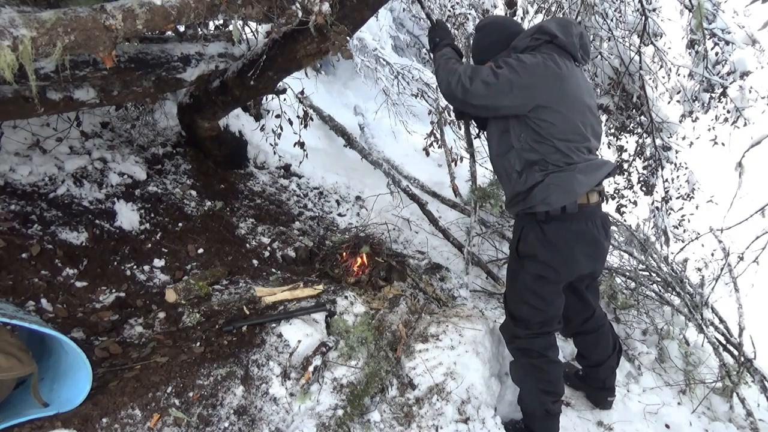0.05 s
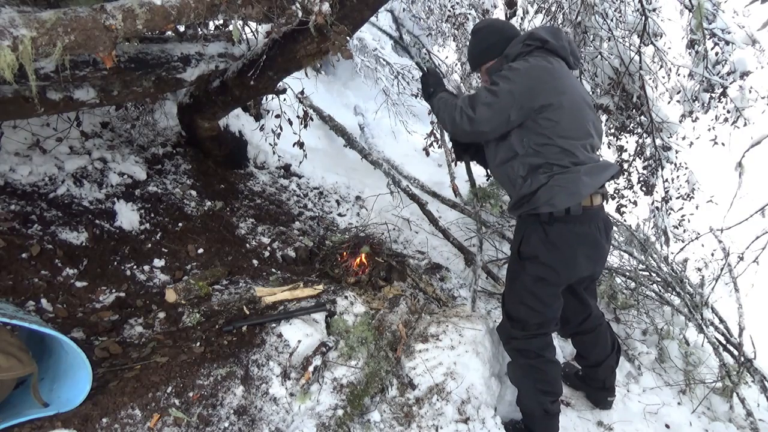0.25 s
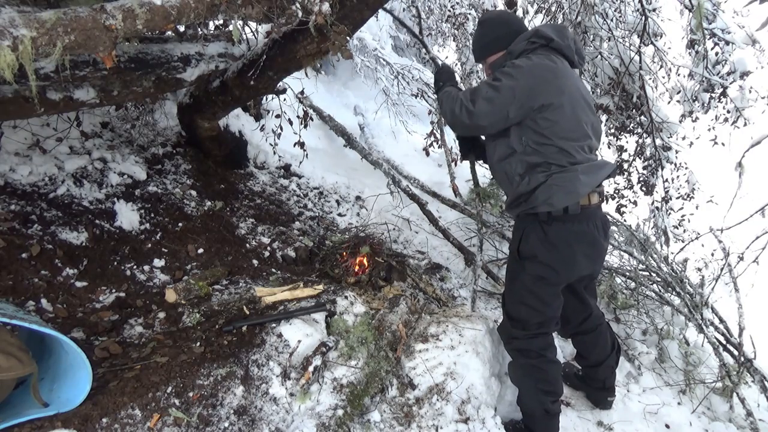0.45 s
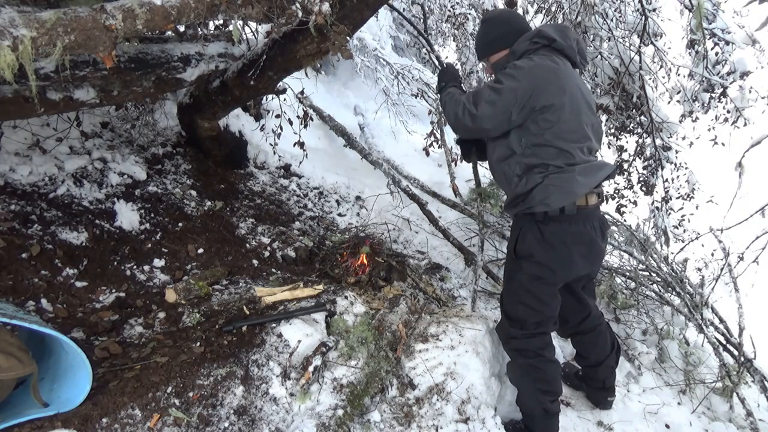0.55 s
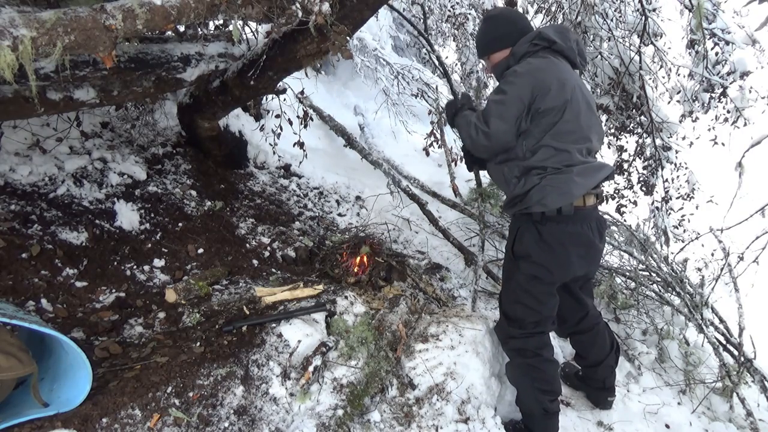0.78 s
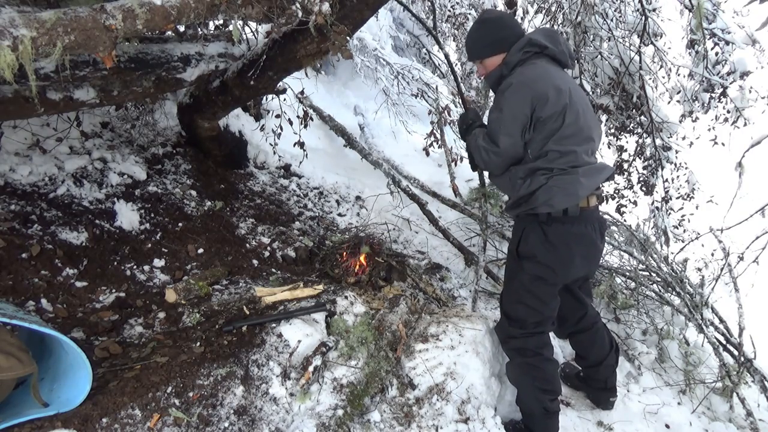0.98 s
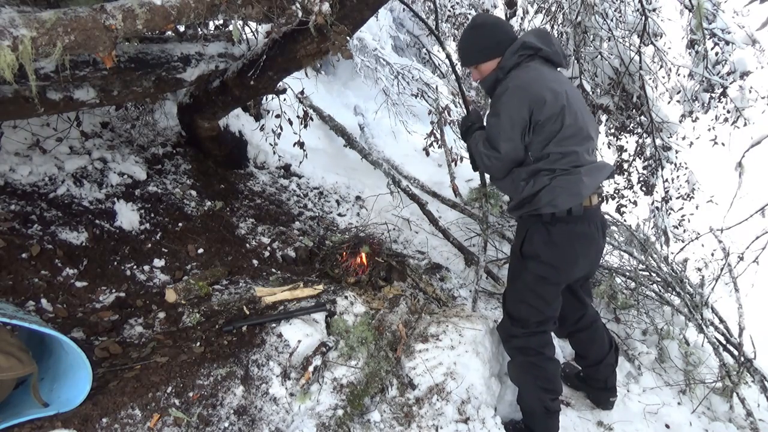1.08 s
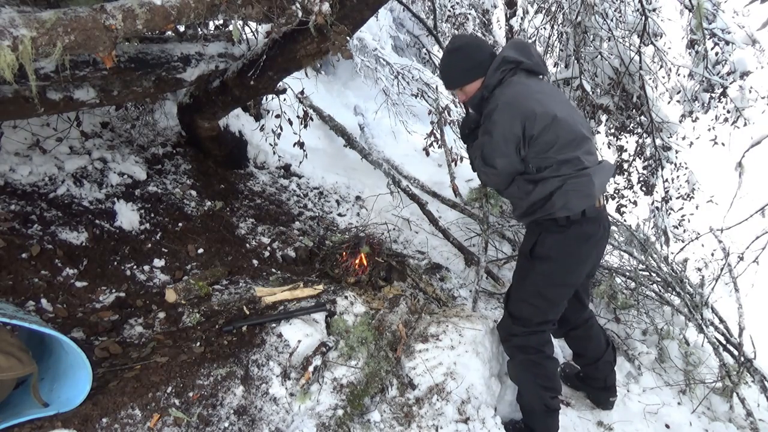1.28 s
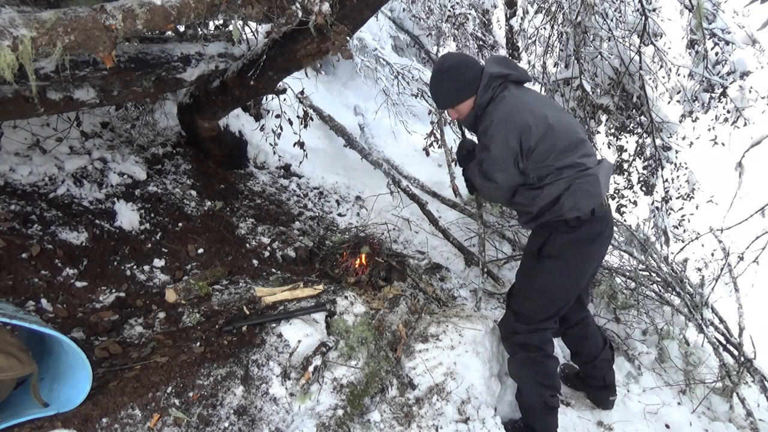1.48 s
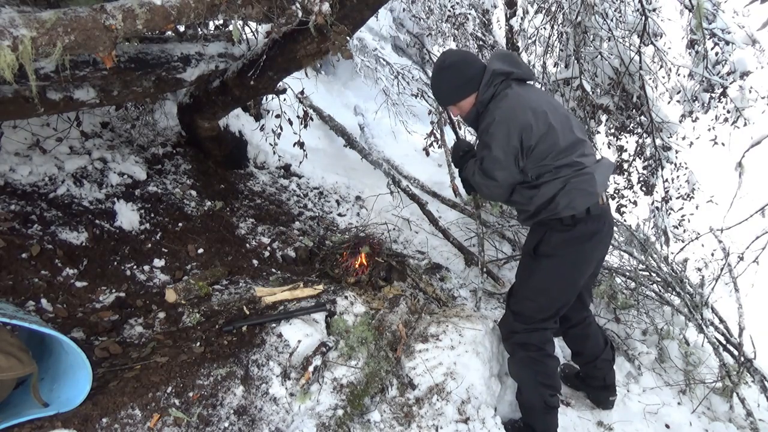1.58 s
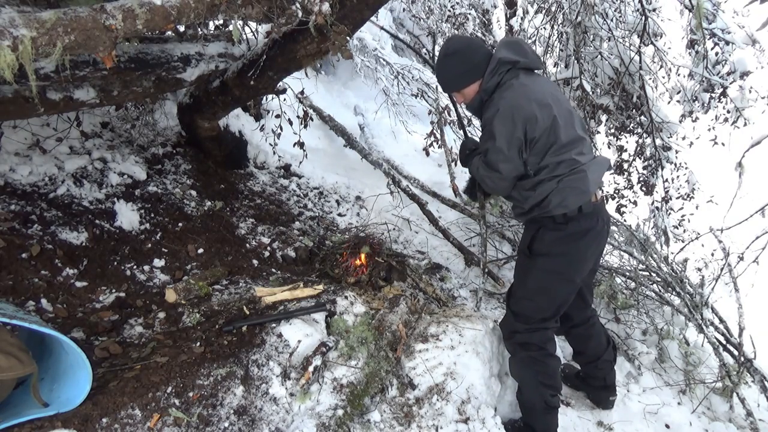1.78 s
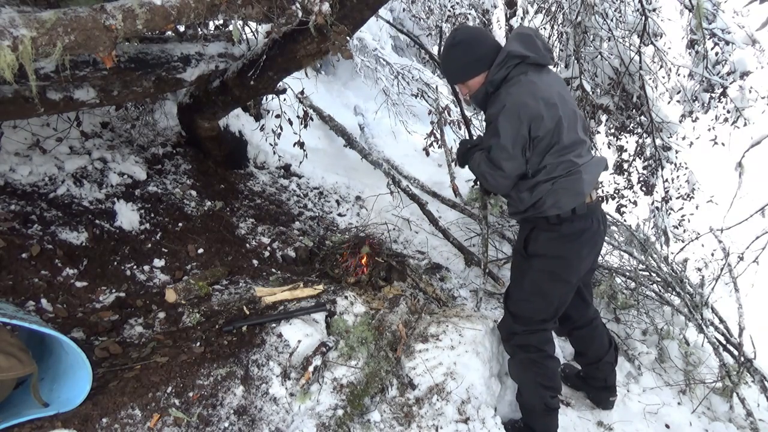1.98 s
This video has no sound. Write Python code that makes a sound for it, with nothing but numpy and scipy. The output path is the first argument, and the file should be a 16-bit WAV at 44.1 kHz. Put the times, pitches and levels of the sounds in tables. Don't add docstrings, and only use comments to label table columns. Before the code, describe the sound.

Dry twigs rustle and scrape, one stick snaps sharply, beside a small softly crackling campfire

```python
import sys
import numpy as np
from scipy import signal
from scipy.fft import rfft, irfft
from scipy.io import wavfile
from scipy.ndimage import uniform_filter1d

SR = 44100
rng = np.random.default_rng(int(sys.argv[2]) if len(sys.argv) > 2 else 0)


def transcribe(signal):
    frames = np.atleast_2d(signal).T
    limited = np.clip(frames, -1, 1)
    pcm = np.round(limited * 32767).astype(np.int16)
    wavfile.write(sys.argv[1], SR, pcm)


def ratio(d):
    e = np.asarray(d, float) / 20
    return 10 ** e


N = 90404

# columns f/Hz, level/dB per Hz
FIRE_SPECTRUM = [(30, -11.5), (70, -4.5), (400, -5), (1000, -9), (3000, -15), (5700, -9.5), (10500, -7),
                 (15500, -18)]
FIRE_DB, PATCHY_DB, SWELL_DB = -47, 2.0, 0.3

# columns t/s, length/s, from f/Hz, to f/Hz, level/dB
SAP_WHISTLES = [
    (.018, .01, 9800, 9000, -53),
    (.03, .012, 10800, 10000, -56),
    (.048, .018, 10500, 9300, -53),
    (.066, .016, 8600, 9600, -52),
    (.088, .012, 9300, 10200, -54),
    (.356, .018, 8800, 8300, -54),
    (.428, .011, 10400, 8500, -48),
    (.985, .03, 10700, 11000, -56),
]
SAP_WIDTH_HZ = 120

# columns t/s, peak level/dB, low edge f/Hz, high edge f/Hz, ring f/Hz
TICKS = [(0.1734, -23.5, 4050, 13500, 6640), (.2045, -37, 3480, 7000, 5200),
         (0.378, -22, 4840, 15700, 15600), (0.406, -26.5, 4000, 15000, 13200),
         (0.4077, -29, 4000, 15000, 9900), (.4745, -38.5, 398, 4500, 1780),
         (.516, -34, 11000, 16000, 14000), (.553, -49, 10000, 16000, 13000),
         (1.0976, -13.5, 2430, 14800, 7000), (1.0979, -27.5, 435, 2730, 6800),
         (1.0981, -20, 8500, 13000, 10400), (1.1067, -26.5, 2050, 11000, 4330),
         (1.5838, -26, 5370, 15500, 9600), (1.595, -27, 8600, 16000, 11500),
         (1.6268, -18, 4630, 11900, 5370), (1.6262, -35, 795, 2980, 5370), (1.7862, -33.5, 610, 2500, 1700),
         (1.796, -22, 8000, 15400, 10000), (1.8633, -34.5, 1190, 2570, 1960),
         (1.872, -14.5, 4740, 14900, 8750), (1.875, -21, 5000, 14000, 8000),
         (1.8713, -33, 1390, 2560, 2010), (0.2789, -15, 4500, 11600, 8200),
         (0.6476, -27.5, 1000, 13000, 2230), (1.287, -25, 7000, 11000, 9050),
         (1.3671, -31, 4000, 11000, 6640), (1.473, -35, 7000, 11000, 8800), (.568, -38, 8000, 15000, 12000),
         (0.426, -40, 1500, 6000, 4000), (0.3303, -34, 6000, 15000, 12000)]
NEAR_TICKS = [
    .3773,
    1.0979,
    1.6268,
]
TICK_RING_DB, TICK_RING_CYCLES, TICK_EDGE_S = -6, 22, 0.0007
TICK_TAIL_DB, TICK_TAIL_S = -13, 0.025
SPARKS_PER_S, SPARK_DB = 25, -37

# columns t/s, rise/s, fall/s, level/dB, grind over level/dB
STROKES = [(.19, 0.027, 0.056, -44.5, -6), (0.2328, .002, 0.0042, -30.5, -18),
           (.235, 0.0047, 0.036, -29.5, 2.5), (.25, 0.015, 0.013, -35.5, -3),
           (0.2767, 0.0007, 0.02, -38, 7), (0.284, 0.025, 0.03, -40, -7), (.33, 0.1, 0.03, -59, 4.5),
           (.46, 0.078, 0.026, -50.5, -5), (0.551, 0.058, 0.07, -44.5, -2.5),
           (0.599, 0.059, 0.039, -39, -1), (.67, 0.056, 0.38, -48, -4), (.79, 0.074, 0.11, -43.5, -4),
           (.95, 0.019, 0.13, -50.5, -14), (1.216, 0.11, 0.15, -43, -1.5), (1.364, 0.012, 0.061, -36.5, -1),
           (1.383, 0.048, 0.032, -35.5, -1.5), (1.463, 0.036, 0.083, -42, -4),
           (1.628, 0.015, 0.11, -46, 0.5), (1.704, 0.0079, 0.071, -44, -1.5),
           (1.738, 0.069, 0.046, -42, -1.5), (1.849, 0.019, 0.028, -39.5, -4),
           (1.883, 0.024, 0.22, -44, -1), (1.98, 0.056, 0.046, -43.5, -2.5)]
# columns t/s, rise/s, fall/s, level/dB
RUBS = [(0.235, 0.0061, 0.07, -40), (0.265, 0.017, 0.061, -39.5), (.6, 0.043, 0.088, -50),
        (.71, 0.028, 0.099, -48), (0.869, 0.028, 0.054, -46), (.96, 0.042, 0.018, -53.5),
        (1.239, 0.13, 0.056, -47.5), (1.359, 0.079, 0.025, -37), (1.463, 0.016, 0.1, -47.5),
        (1.564, 0.022, 0.058, -48), (1.7, 0.021, 0.058, -48.5), (1.759, 0.02, 0.19, -50.5),
        (1.889, 0.037, 0.082, -49.5), (1.99, 0.037, .04, -48)]
RISE_BEND, FALL_BEND = 0.68, 1
# columns f/Hz, level/dB per Hz
RASP = [(2500, -2), (4500, 0), (6000, 4), (9500, 1), (11500, -7), (15500, -21)]
# columns f/Hz, level/dB per Hz
GRIND = [(700, -17), (1400, 3), (3800, -5), (6000, -4.5)]
# columns f/Hz, level/dB per Hz
BODY = [(150, -13), (280, -0.5), (800, 0.5), (1400, -10.5), (2500, -7), (4500, -73)]
SLIPS_PER_S, SLIP_SPREAD_DB, FLICKER_DB = 14000, 1.6, 1.0

# columns t/s,
# rise/s, fall/s, level/dB, f/Hz
SWISHES = [(.236, 0.0066, 0.014, -31, 3930), (.236, .004, 0.014, -34, 10500),
           (0.274, 0.0016, 0.015, -27, 5100), (0.287, .002, 0.013, -36, 4320),
           (.57, 0.024, 0.032, -45.5, 5200), (.62, 0.026, 0.026, -43, 8200), (.61, 0.048, 0.055, -46, 3770),
           (.69, .01, 0.04, -47.5, 4360), (.81, 0.034, .06, -48, 9900), (.83, 0.049, .05, -52, 4800),
           (1.23, 0.081, 0.11, -41.5, 9000), (1.33, .015, 0.035, -41.5, 5740),
           (1.367, 0.026, 0.044, -38.5, 5650), (1.39, 0.04, 0.037, -42.5, 3900),
           (1.468, .01, 0.068, -53, 9150), (1.55, 0.028, 0.058, -55.5, 3150),
           (1.77, 0.03, 0.027, -54, 4600), (1.86, 0.017, 0.019, -45, 11500), (.45, .4, 1.2, -62, 13500),
           (1.97, 0.075, .05, -60, 5800), (.233, .004, .016, -48, 13300), (.24, 0.0052, 0.0068, -37, 6100),
           (1.365, .03, 0.049, -52, 13300), (.62, 0.024, 0.026, -64, 13000),
           (1.406, 0.014, 0.016, -52, 1080), (1.41, 0.017, 0.029, -47, 640), (1.365, .02, 0.088, -38, 150),
           (2.02, .02, .02, -47.5, 1630)]
SWISH_SPREAD = 0.16

# columns t/s, level/dB, f/Hz, t60/s
THUDS = [(0.241, -29.5, 137, 0.073), (0.272, -36, 104, 0.098), (0.886, -36, 230, 0.12),
         (0.918, -46, 111, 0.061), (0.986, -58, 337, 0.034), (1.367, -16, 190, 0.028),
         (1.373, -34, 110.2, 0.24), (1.394, -27, 148, 0.064), (1.419, -25, 168.5, 0.074),
         (1.439, -32, 127.6, 0.077), (1.491, -37, 107, 0.07), (1.529, -36, 232, 0.04),
         (1.959, -50, 302, 0.034)]
THUD_RISE_S, THUD_SAG, THUD_ROUGH = 0.004, 0.03, 0.6

# columns t/s, level/dB, contact edge f/Hz
FRACTURES = [
    (.2731, -7, 3900),
    (.2740, -12, 4200),
    (.2747, -17, 6500),
    (.2753, -9, 5500),
    (.2772, -14, 7000),
    (.2785, -22, 8000),
    (.2800, -21, 5000),
    (.2815, -22, 4000),
    (.2846, -19, 2500),
    (.29, -28, 6000),
]
# columns f/Hz, level/dB, t60/s
STICK_MODES = [(890, -10.5, 0.026), (1030, 2.5, 0.018), (1180, -1.5, 0.0078), (1500, -6, 0.016),
               (1760, -3, 0.023), (2330, 2.5, 0.0064), (3060, 0.5, 0.0065), (3900, 1, 0.0053),
               (4750, -5, 0.0058)]

# columns f/Hz, side under mid level/dB
SIDE_SPECTRUM = [(60, -15), (200, -17.5), (380, -12), (700, -22), (2380, -21), (4400, -34), (8120, -27),
                 (15000, -22)]
AIR_EDGE_HZ, EDGE_HZ = 15750, 16900


def evened(x):
    return x / np.sqrt(np.mean(x ** 2) + 1e-20)


def smoothed(x, size):
    return uniform_filter1d(uniform_filter1d(x, size=size), size=size)


def add(mix, s, sound):
    part = mix[round(s * SR):][:len(sound)]
    part += sound[:len(part)]


def coloured(x, points):
    f, level = np.transpose(points)
    hz = np.fft.rfftfreq(len(x), 1 / SR)
    db = np.interp(np.log(hz + 1), np.log(f + 1), level, left=level[0] - 40)
    return irfft(rfft(x) * ratio(db), len(x))


def filtered(x, order, hz, kind):
    return signal.sosfilt(signal.butter(order, hz, kind, fs=SR, output="sos"), x)


def ring(hz, t60, t):
    return ratio(-60 * t / max(t60, 0.001)) * np.sin(2 * np.pi * hz * t)


def fire():
    frames = N // 128 + 5
    real, imaginary, patches = rng.standard_normal((3, 257, frames))
    patches = uniform_filter1d(patches, size=8, axis=0)
    patches = evened(uniform_filter1d(patches, size=16, axis=1))
    slow = evened(uniform_filter1d(rng.standard_normal(frames), size=30))
    z = (real + 1j * imaginary) * ratio(PATCHY_DB * patches + SWELL_DB * slow)
    noise = signal.istft(z, nperseg=512, noverlap=384)[1][:N]
    return ratio(FIRE_DB) * evened(coloured(noise, FIRE_SPECTRUM))


def sap():
    out = np.zeros(N)
    for s, length, from_hz, to_hz, db in SAP_WHISTLES:
        length = min(length, 0.03)
        u = np.arange(0, length, 1 / SR) / length
        wobble = evened(uniform_filter1d(rng.standard_normal(1500), size=60))[:len(u)]
        hz = from_hz + (to_hz - from_hz) * u + SAP_WIDTH_HZ * wobble
        whistle = np.sin(2 * np.pi * np.cumsum(hz) / SR)
        add(out, s, ratio(db + 6) * np.sin(np.pi * u) ** 0.5 * whistle)
    return out


def tick(low_hz, high_hz, ring_hz, grit):
    t = np.arange(len(grit)) / SR
    edge = ratio(-60 * t / TICK_EDGE_S) * (1 + abs(grit)) * np.cos(2 * np.pi * ring_hz * t)
    tail = ratio(TICK_TAIL_DB - 60 * t / TICK_TAIL_S) * grit[::-1]
    body = ratio(TICK_RING_DB) * ring(ring_hz, TICK_RING_CYCLES / ring_hz, t)
    sound = filtered(edge + tail + body, 3, [low_hz, high_hz], "band")
    return sound / abs(sound).max()


def sparks():
    hits = rng.random(N) < SPARKS_PER_S / SR
    train = hits * ratio(SPARK_DB + 3 * rng.standard_normal(N))
    return signal.oaconvolve(train, tick(3000, 7800, 11000, rng.standard_normal(400)))[:N]


def crackle(near):
    out = np.zeros(N)
    for s, db, low_hz, high_hz, ring_hz in TICKS:
        grit = rng.standard_normal(1200)
        is_near = min(abs(s - np.array(NEAR_TICKS))) < 0.003
        if is_near == near:
            add(out, s, ratio(db) * tick(low_hz, high_hz, ring_hz, grit))
    return out


def stroke_power(rise, fall, db):
    up = np.arange(0, rise, 1 / SR) / rise
    down = np.arange(0, fall, 1 / SR) / fall
    return (np.r_[up ** RISE_BEND, (1 - down) ** FALL_BEND] * ratio(db)) ** 2


def slip_gain():
    return ratio(SLIP_SPREAD_DB * np.minimum(rng.exponential(1, N), 4))


def twigs():
    rasp, grind, body = power = np.zeros((3, N))
    for start, rise, fall, db, grind_db in STROKES:
        add(rasp, start, stroke_power(rise, fall, db))
        add(grind, start, stroke_power(rise, fall, db + grind_db))
    for start, rise, fall, db in RUBS:
        add(body, start, stroke_power(rise, fall, db))
    caught = rng.random(N) < SLIPS_PER_S / SR
    slips = rng.standard_normal((3, N)) * (0.6 + caught * slip_gain())
    flicker = ratio(FLICKER_DB * evened(smoothed(rng.standard_normal(N), 120)))
    out = np.zeros(N)
    for layer, grit, spectrum in zip(power, slips, (RASP, GRIND, BODY)):
        out += np.sqrt(layer) * evened(coloured(grit, spectrum))
    return flicker * out


def swishes():
    out = np.zeros(N)
    grit = rng.standard_normal(N) * slip_gain()
    for start, rise, fall, db, hz in SWISHES:
        band = [hz * (1 - SWISH_SPREAD), hz * (1 + SWISH_SPREAD)]
        begin = round(start * SR)
        power = stroke_power(rise, fall, db)[:N - begin]
        noise = evened(filtered(grit, 2, band, "band"))[begin:][:len(power)]
        add(out, start, np.sqrt(power) * noise)
    return out


def thuds():
    out, t = np.zeros(N), np.arange(8000) / SR
    for s, db, hz, t60 in THUDS:
        sagging_hz = hz * (1 - THUD_SAG * np.tanh(t / t60))
        add(out, s, ratio(db) * np.minimum(t / THUD_RISE_S, 1) * ring(sagging_hz, t60, t))
    crumble = evened(smoothed(rng.standard_normal(N), 200))
    return filtered(out * (1 + THUD_ROUGH * crumble), 3, 65, "high")


def snap():
    out, t = np.zeros(N), np.arange(3000) / SR
    for s, db, edge_hz in FRACTURES:
        modes = np.zeros(len(t))
        for hz, mode_db, t60 in STICK_MODES:
            modes -= 0.27 * ratio(db + mode_db + 2 * rng.standard_normal()) * ring(hz, t60, t)
        add(out, s, filtered(modes, 4, edge_hz, "low"))
    return filtered(out, 3, 620, "high")


def scene():
    soft = fire() + sap() + sparks() + crackle(False) + twigs() + swishes() + thuds() + snap()
    air = signal.firwin(1023, AIR_EDGE_HZ, fs=SR)
    mid = signal.oaconvolve(soft, air, "same") + crackle(True)
    scatter = rng.standard_normal(3000) * ratio(-60 * np.arange(3000) / 3000)
    scattered = signal.oaconvolve(mid, scatter / np.linalg.norm(scatter))[:N]
    side = coloured(scattered, SIDE_SPECTRUM)
    return np.array([mid + side, mid - side])


def top_cut(x):
    return signal.sosfilt(signal.butter(12, 17020, fs=SR, output="sos"), x)


def record(dry):
    limited = signal.oaconvolve(dry, signal.firwin(255, EDGE_HZ, fs=SR)[None], "same")
    return top_cut(limited)


dry = scene()
out = record(dry)
transcribe(out)
```